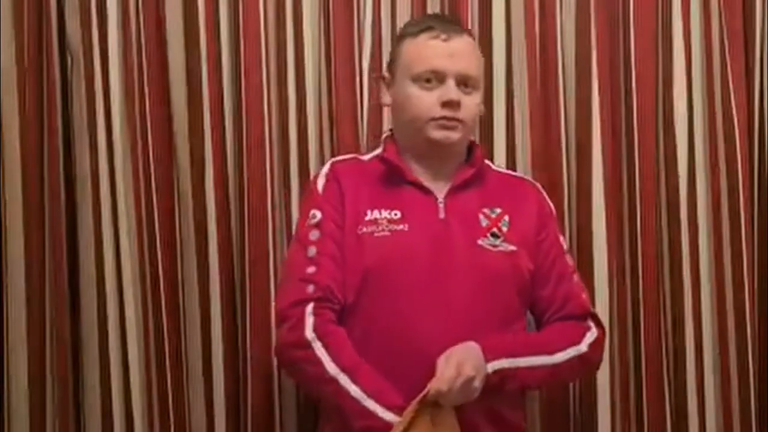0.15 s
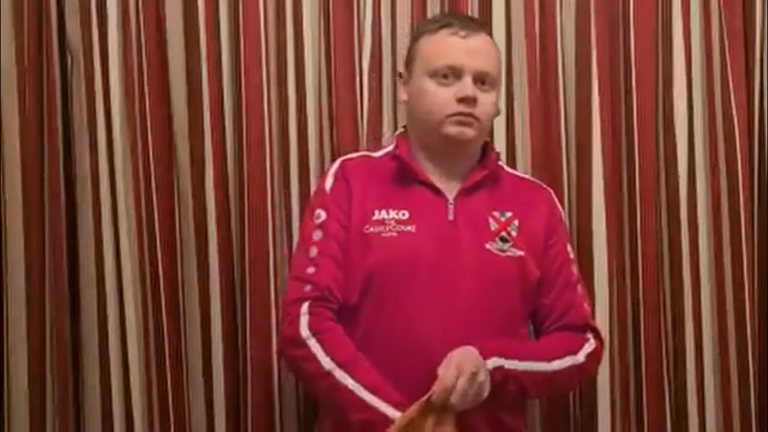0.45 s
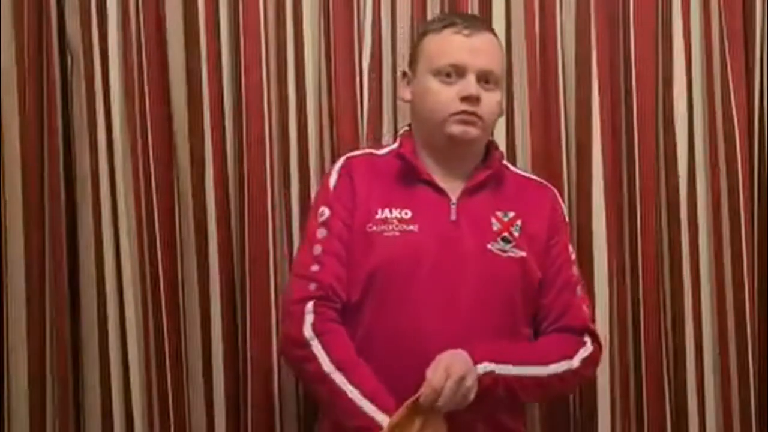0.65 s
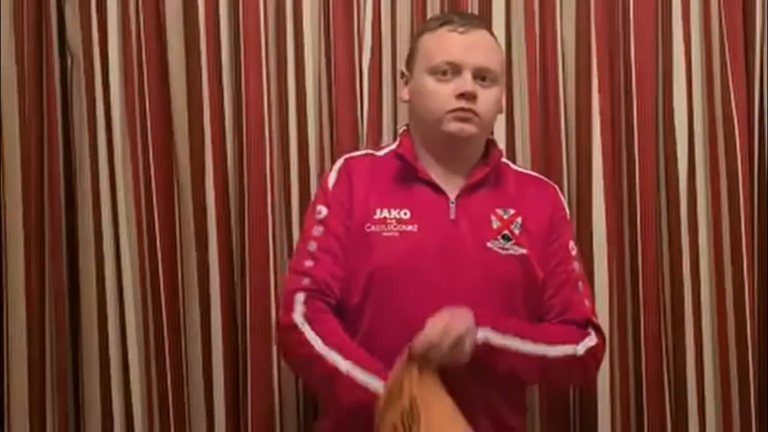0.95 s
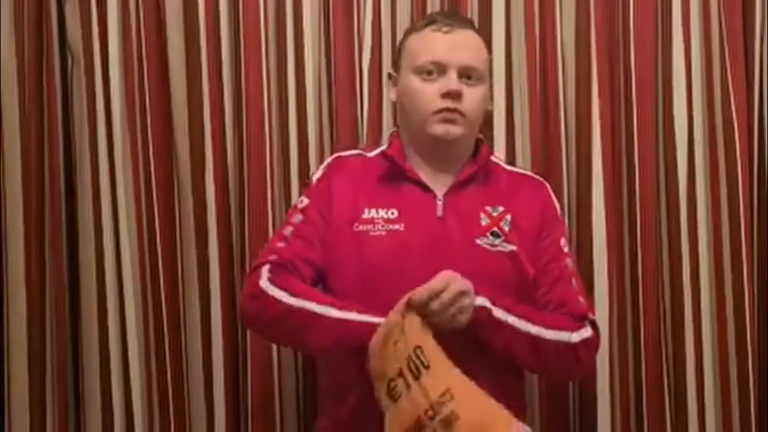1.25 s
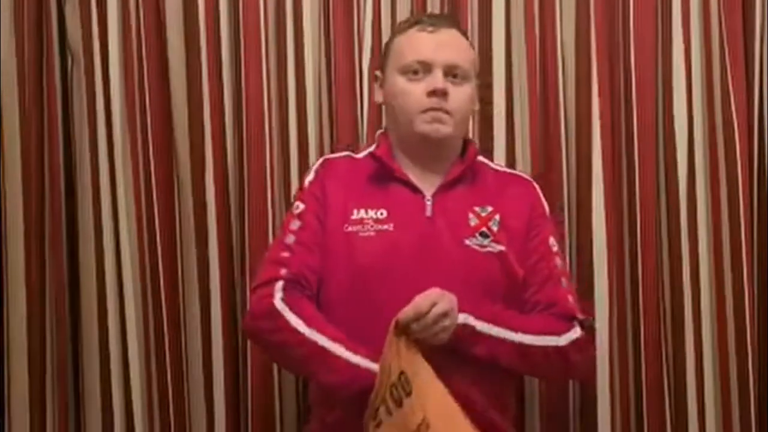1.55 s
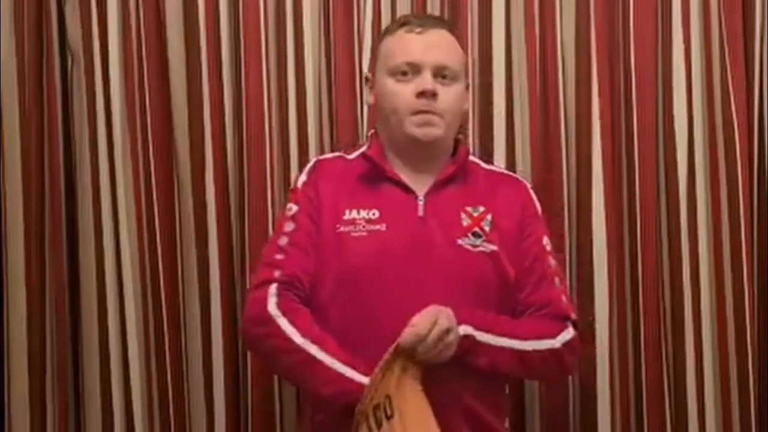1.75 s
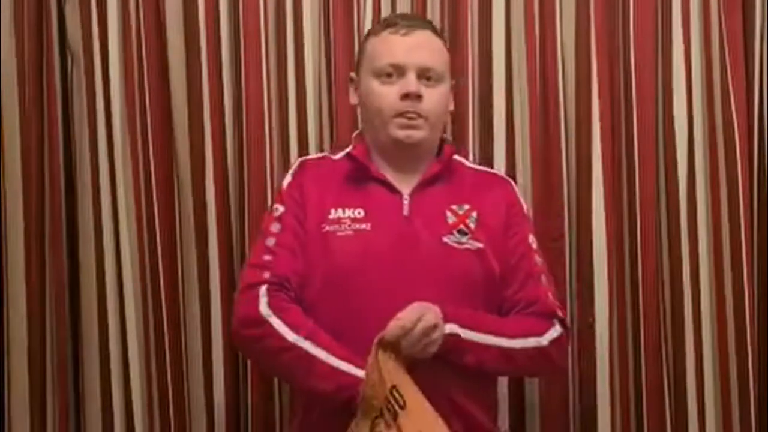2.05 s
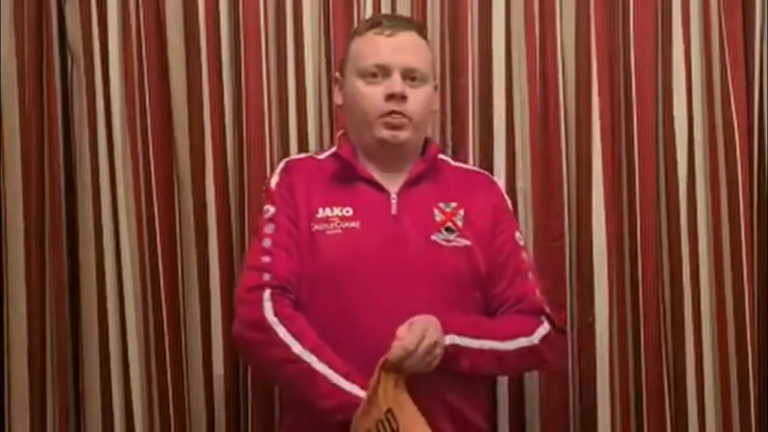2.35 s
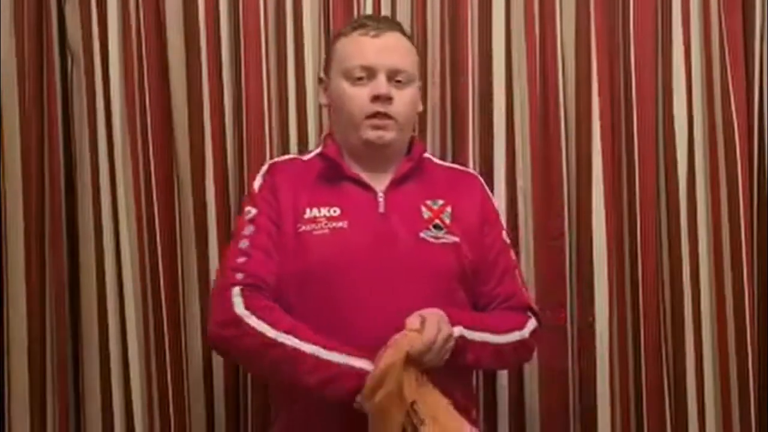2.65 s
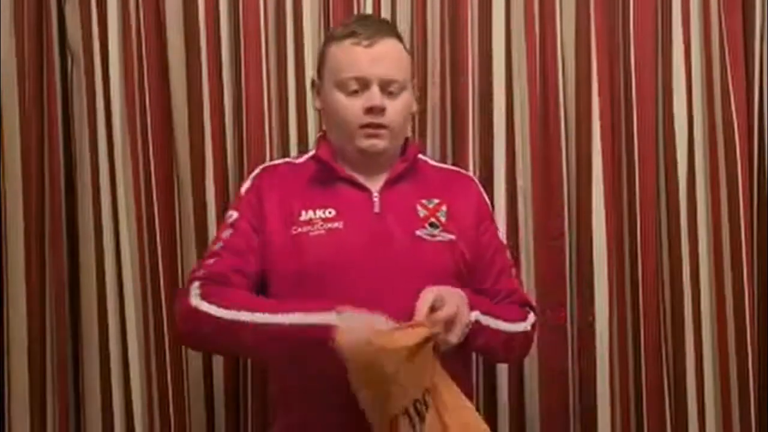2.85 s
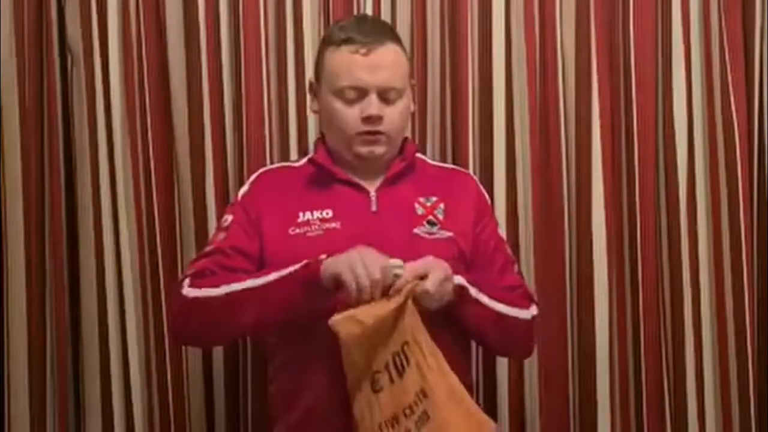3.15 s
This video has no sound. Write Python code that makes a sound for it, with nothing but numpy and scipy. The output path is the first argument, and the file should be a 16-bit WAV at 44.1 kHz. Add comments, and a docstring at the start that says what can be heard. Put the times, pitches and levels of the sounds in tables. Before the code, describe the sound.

Light hollow plastic balls are stirred in a thin bag from the start, clattering irregularly with short dry knocks and high crackly rustle. The stirring swells around 1.2-1.5 s, dips near 1.7 s, and bursts into its sharpest clacks at 2.0-2.2 s. It fades by 2.4 s, with a few weak knocks to 2.75 s. Faint finger rubs and ticks follow, notably at 3.0 s, over soft hiss and low rumble in a small room.

```python
"""In a curtained room, a step away, a hand stirs light hollow plastic balls in a thin bag.
Dense clatter is a sum of random damped sines; clear knocks excite the modes of single shells.
The bag's rustle and crackle are high-pitched grains and shaped noise; the load's thuds are damped
low sines. At the end fingers turn the drawn ball, as grains and shaped noise of rubbing skin.
Decaying noise gives the room's reverberation, over a steady hiss and a low rumble."""
import sys
import numpy as np
from scipy import signal
from scipy.fft import rfft, irfft, next_fast_len
from scipy.io import wavfile
from scipy.ndimage import uniform_filter1d, map_coordinates

SR = 44100
rng = np.random.default_rng(int(sys.argv[2]) if len(sys.argv) > 2 else 0)


def put_to_file(sound):
    """Save the sound as 16-bit audio at rate SR, in the file named by the first command-line argument."""
    columns = np.atleast_2d(sound).T  # one column per channel
    safe = np.clip(columns, -1, 1)
    whole_steps = np.round(safe * 32767)
    wavfile.write(sys.argv[1], SR, whole_steps.astype(np.int16))


N = 145530  # samples

# Drive of the stirring hand: t/s, clatter level/dB, bag rustle re clatter level/dB,
# low part re the upper part of the clatter level/dB
STIRRING_DRIVE = [(0, -49, -6.5, -4), (.03, -52.5, -6, -4), (.085, -49.5, -5, -3.5), (.1, -44.5, -4.5, -6),
                  (.16, -52.5, -1.5, -4), (.235, -44, -3, -8), (.265, -50.5, -6, -2.5),
                  (.3, -49, 2.5, -2.5), (.315, -44.5, 0.5, -5), (.52, -45.5, -1.5, -11.5),
                  (.55, -50, 0, -9), (.565, -44.5, -1, -8.5), (.62, -42, -2.5, -11), (.65, -44, -1, -8),
                  (0.684, -42, -5.5, -4.5), (.735, -49, -8, -16), (0.747, -43.5, -3, -4.5),
                  (.81, -46, -3, -4.5), (.86, -52.5, -7, -10), (0.894, -51, 0, -9), (.903, -44, -6, -10),
                  (0.936, -42, -3, -4.5), (.98, -49.5, -4, -10), (.992, -42.5, -5, -5.5),
                  (1.07, -55, 2.5, -14), (1.1, -50, -2.5, -3), (1.17, -49, -1, -19.5),
                  (1.21, -41, 1, -15.5), (1.39, -41.5, -2.5, -10), (1.415, -38.5, 0, -6),
                  (1.48, -38.5, -5.5, -10.5), (1.54, -44, -3, -10.5), (1.59, -49.5, -3, -8.5),
                  (1.771, -57.5, -3, -10), (1.779, -44, -5, -20), (1.85, -45, 0, -6.5),
                  (1.89, -49.5, -3.5, -12), (1.95, -44, 2, -12), (1.982, -43.5, -5, -17),
                  (1.987, -36.5, -7, -25), (2.065, -50.5, -4, -11.5), (2.135, -48, -3.5, -15),
                  (2.14, -37.5, -4, -16), (2.189, -40, -3, -10.5), (2.3, -53.5, -5, -9),
                  (2.372, -69.5, -8, -12), (2.382, -54, -2, -12), (2.49, -63, -7, -5), (2.545, -53, 2, -14),
                  (2.59, -60, -6, -10), (2.6, -52.5, -1.5, -13.5), (2.759, -53.5, -1.5, -12),
                  (2.83, -76.5, -7, -2.5), (3.012, -82.5, -7, -1), (3.022, -60, -2.5, -2.5),
                  (3.3, -82, -3, -4)]
# Clear knocks: t/s, shell level/dB, nominal pitch f/Hz, snap of the bag re shell level/dB
BALL_KNOCKS = [(0.1, -23, 1040, -14.5), (0.229, -31, 1020, -16.5), (0.386, -27.5, 1580, -12.5),
               (0.447, -27, 1530, -14), (0.563, -30, 1410, -10.5), (0.618, -32, 1530, -15),
               (0.627, -31, 1500, -14), (0.676, -27, 1680, -13.5), (0.678, -25, 1510, -14),
               (0.745, -32.5, 1590, -9), (0.776, -24.5, 953, -17), (0.812, -27, 1570, -16),
               (0.906, -30, 1110, -11), (0.921, -27.5, 1190, -8), (0.989, -25.5, 1740, -15),
               (1.125, -29, 1470, -8.5), (1.16, -31, 1450, -12), (1.174, -23, 1490, -17),
               (1.195, -25.5, 1550, -12.5), (1.287, -27.5, 1480, -11), (1.36, -31, 1760, -5.5),
               (1.413, -30, 1550, -7.5), (1.425, -23, 1040, -15), (1.437, -24, 1470, -16),
               (1.451, -31, 1790, -14), (1.472, -29, 1720, -16), (1.488, -26, 940, -19),
               (1.56, -26, 1520, -21), (1.611, -30.5, 1140, -11), (1.778, -41.5, 1540, -5),
               (1.786, -25, 1680, -19), (1.832, -31.5, 1600, -4.5), (1.986, -20.5, 1410, -15),
               (1.987, -21, 1620, -15), (1.992, -23, 1580, -14), (2.005, -28, 1600, -20),
               (2.083, -33, 1520, -12), (2.117, -24, 1550, -16), (2.14, -24.5, 1510, -12),
               (2.147, -24, 1850, -19.5), (2.16, -31, 1500, -12), (2.183, -24, 1480, -14),
               (2.196, -28, 1490, -18), (2.208, -25.5, 1380, -15), (2.382, -34.5, 1550, -17),
               (2.643, -37, 1630, -18), (2.713, -36.5, 1780, -6), (3.094, -42, 1420, -19)]
# Drops of the load: t/s, level before filtering/dB
LOAD_THUDS = [(.891, -47.5), (0.911, -51), (1.669, -66), (2.129, -63)]
# Modes of one shell: multiple of the pitch/1, level re the knock/dB, T60/ms
SHELL_MODES = [(1, 1, 7.6), (1.9, -5, 4.2), (.6, -18.5, 7.3), (2.7, -11, 2.9)]
# Spectrum of the heap of balls: f/Hz, relative level per Hz/dB
HEAP_SPECTRUM = [(88, -46), (150, -23), (288, -22), (372, -12), (577, -7), (818, -6.5), (981, -4),
                 (1110, -5.5), (1570, -3), (2190, -9), (3200, -8), (5600, -23.5), (7280, -66),
                 (12300, -120)]
# Spectrum of the bag film: f/Hz, relative level per Hz/dB
BAG_SPECTRUM = [(3180, -34), (5400, -30), (5930, -4.5), (6730, -2.5), (7800, -2.5), (8770, -1.5),
                (10200, -2.5), (11000, 3), (12400, 4.5), (13000, 3), (14400, -1.5), (15800, -11)]
# Spectrum of the steady background: f/Hz, relative level per Hz/dB
FLOOR_SPECTRUM = [(90, -32), (150, 9), (1000, -29), (4000, -9), (7000, -0.5), (9000, -18), (15800, -17)]
# Spectrum of the low rumble: f/Hz, relative level per Hz/dB
RUMBLE_SPECTRUM = [(15, -46), (25, 0), (70, 3.5), (113, -5.5), (140, -3.5), (260, -10.5), (340, -26),
                   (570, -120)]
# Reverberation of the room before each tail's scale: f/Hz, T60/s
ROOM_DECAY = [(300, 0.33), (1500, 0.11), (5000, 0.15), (12000, 0.22)]
# Stereo width, the gain of the side signal: f/Hz, level/dB
SIDE_GAIN = [(60, -2.5), (110, -12.5), (200, -10.5), (380, -11), (700, -4), (1290, 1), (2380, -1.5),
             (4400, 1), (7000, -2.5), (8500, -22), (11500, -15.5), (14500, -18)]
# Notches of the microphone housing: centre f/Hz, half-width/Hz, depth/1 (capped when applied)
HOUSING_NOTCHES = [(5340, 67, 1), (7860, 530, 0.45), (13040, 430, 0.71)]
# Fingers turning one ball: t/s, level/dB
FINGER_DRIVE = [(2.799, -63.5), (2.922, -85.5), (2.934, -66.5), (2.962, -84), (3.012, -78), (3.021, -53.5),
                (3.138, -100), (3.162, -65), (3.184, -101), (3.3, -88)]
# Spectrum of skin on plastic: f/Hz, relative level per Hz/dB
SKIN_SPECTRUM = [(1180, -19), (2000, -7), (3550, -6), (4050, 7), (5500, -14), (6570, 4.5), (7400, -5),
                 (8310, -17), (11600, -7), (15000, -14)]
# Free balls ringing at their shell pitch: t/s, level re the upper part of the clatter/dB
FREE_SHELL_DRIVE = [(0, -14.5), (1.1, -13), (1.6, -12), (1.95, -12), (2.75, -5), (3.0, -22)]

CLATTER_PER_S, CLATTER_HZ, CLATTER_CYCLES = 1000, 1504, 2.25
CLATTER_PITCH_SPREAD, CLATTER_SPREAD_DB = 0.47, 5.5  # log-pitch deviation; mean excess level
RUB_DB = -6  # balls sliding on cloth, re the contacts
LOW_PART_HZ = 950  # split of the clatter
SHELL_HZ, SHELL_CUT_HZ = 1559, 715  # mean pitch; a small shell radiates no bass
CRACKLE_PER_S, CRACKLE_HZ, CRACKLE_SPREAD_DB = 1500, 10800, 10.5
HISS_DB = 3.5  # smooth rustle re the crackle
CONTACT_S = 0.00016  # time constant of a contact's rise
LOUDEST_DB = 11  # cap on a chance contact
MODE_SCATTER, MODE_SCATTER_DB = 0.034, 1.5  # pitch ratio and level, knock to knock
SNAP_RISE_S, SNAP_T60_S = 0.00084, 0.029
KNOCK_DIRECT_DB = 4  # knocks arrive more directly than the heap
THUD_HZ, THUD_T60_S = 64, 0.12
ROOM_DB = -1.5  # reverberation re dry sound, in the mid
FLOOR_DB = -81
RUMBLE_DB, RUMBLE_END_DB = -80.5, -84.5  # while stirring, at the end
LEFT_DB = -1.54  # left re right channel gain
TOP_HZ = 15770


def amp(db):
    """Level definition: 20 dB is a factor of ten in amplitude."""
    return 10 ** (np.asarray(db) / 20)


def unit(x):
    """Normalization by the root mean square."""
    return x / np.sqrt(np.mean(x ** 2) + 1e-20)


def along(points, hz):
    """Interpolation on a logarithmic frequency axis."""
    f, value = np.transpose(points)
    return np.interp(np.log(hz + 1), np.log(f + 1), value)


def over_time(t_s, values, **ends):
    """Linear interpolation in time, at every sample."""
    return np.interp(np.arange(N) / SR, t_s, values, **ends)


def noise():
    """White noise: equal mean power at every frequency."""
    return rng.standard_normal(N)


def filtered(x, response):
    """Linear filtering: the spectrum is multiplied by a frequency response."""
    size = next_fast_len(N + SR // 2)  # padding lets the response die out
    return irfft(rfft(x, size) * response(np.fft.rfftfreq(size, 1 / SR)), size)[..., :N]


def shaped(x, spectrum):
    """Spectral shaping: broad bands are whitened, then weighted; rms 1."""
    z = rfft(x)
    broad = np.sqrt(np.abs(uniform_filter1d(np.abs(z) ** 2, size=1500))) + 1e-9
    weight = amp(along(spectrum, np.fft.rfftfreq(N, 1 / SR)))
    return unit(irfft(z / broad * weight, N))


def wobble(rate):
    """Slow random modulation: a smooth curve through `rate` random knots a second."""
    knots = rng.standard_normal(int(N * rate / SR) + 4)
    return map_coordinates(knots, [np.arange(N) * rate / SR])


def rings(s, hz, gain, t60, size=900):
    """Free damped vibration: each contact starts an exponentially decaying sine."""
    t = np.arange(size) / SR
    decay = amp(-60 * t / t60[:, None])
    rise = 1 - np.exp(-t / CONTACT_S)
    wave = gain[:, None] * np.sin(2 * np.pi * hz[:, None] * t) * decay * rise
    at = (s * SR).astype(int)[:, None] + np.arange(size)
    return np.bincount(at.ravel(), wave.ravel(), N + size)[:N]


def grains(per_s, hz, spread, cycles, spread_db, size):
    """Random superposition of brief contacts of scattered pitch, mostly weak; rms 1."""
    count = int(per_s * N / SR)
    s = rng.random(count) * N / SR
    pitch = np.clip(hz * np.exp(spread * rng.standard_normal(count)), 500, 15500)
    gain = amp(np.minimum(spread_db * rng.standard_exponential(count), LOUDEST_DB))
    t60 = np.log(1000) / 2 * cycles / pitch  # amplitude falls by e squared in `cycles` periods
    return unit(rings(s, pitch, gain, t60, size))


def heap_clatter(low_db):
    """Multiple impacts: balls collide and slide, and free shells ring at their own pitch."""
    contacts = grains(CLATTER_PER_S, CLATTER_HZ, CLATTER_PITCH_SPREAD, CLATTER_CYCLES,
                      CLATTER_SPREAD_DB, size=700)
    sliding = shaped(noise(), HEAP_SPECTRUM)
    heap = shaped(contacts + amp(RUB_DB) * sliding, HEAP_SPECTRUM)
    low = filtered(heap, lambda hz: 1 / (1 + (hz / LOW_PART_HZ) ** 4))
    heap = unit(heap - low) + amp(low_db) * unit(low)
    free_shells = grains(250, SHELL_HZ, 0.086, 7.0, 3.6, size=700)
    return heap + amp(over_time(*np.transpose(FREE_SHELL_DRIVE))) * free_shells


def bag_rustle():
    """Thin-film crackle: dense high-pitched snaps lie in smooth hiss."""
    crackle = grains(CRACKLE_PER_S, CRACKLE_HZ, 0.368, 8.6, CRACKLE_SPREAD_DB, size=100)
    hiss = shaped(noise(), BAG_SPECTRUM)
    return shaped(crackle + amp(HISS_DB) * hiss, BAG_SPECTRUM)


def stirring():
    """Common excitation: one hand drives the heap's clatter and the bag's rustle."""
    s, level_db, rustle_db, low_db = np.transpose(STIRRING_DRIVE)
    level_db = over_time(s, level_db) + 0.66 * wobble(60)
    rustle_db = over_time(s, rustle_db) + 1.8 * wobble(40.06)
    heap = heap_clatter(over_time(s, low_db))
    return amp(level_db) * (heap + amp(rustle_db) * bag_rustle())


def room_tail(x, scale, delay_s):
    """Reverberation: delayed diffuse sound decays at a rate set by frequency."""
    out, hop = np.zeros(N + SR), 4096
    for a in range(0, N, hop):  # a new random tail for each short stretch
        hz, t, z = signal.stft(rng.standard_normal(SR // 3), SR, nperseg=256)
        t60 = scale * along(ROOM_DECAY, hz)[:, None]
        response = signal.istft(z * amp(-60 * t / t60), SR, nperseg=256)[1]
        part = signal.fftconvolve(x[a:a + hop], response / np.linalg.norm(response))
        out[a + int(delay_s * SR):][:len(part)] += part
    return out[:N]


def background():
    """Stationary noise: independent mid and side hiss and rumble, slowly modulated."""
    hiss = np.array([shaped(noise(), FLOOR_SPECTRUM) for _ in "ms"])
    rumble = np.array([shaped(noise(), RUMBLE_SPECTRUM) for _ in "ms"])
    rumble_db = over_time([2.2, 2.9], [RUMBLE_DB, RUMBLE_END_DB])
    return amp(FLOOR_DB + 3.1 * wobble(5.38)) * hiss + amp(rumble_db + 1.4 * wobble(5.3)) * rumble


def knocks():
    """Modal excitation: an impact rings a shell's modes briefly and snaps the bag."""
    s, db, hz, snap_db = np.transpose(BALL_KNOCKS)
    shell = np.zeros(N)
    for multiple, mode_db, t60_ms in SHELL_MODES:
        pitch = hz * multiple * (1 + MODE_SCATTER * rng.standard_normal(len(s)))
        gain = amp(db + mode_db + MODE_SCATTER_DB * rng.standard_normal(len(s)))
        shell += rings(s, pitch, gain, np.full(len(s), t60_ms / 1000))
    spikes = np.bincount((s * SR).astype(int), amp(db + snap_db), N)[:N]
    t = np.arange(1500) / SR
    snap = amp(-60 * t / SNAP_T60_S) * (1 - np.exp(-t / SNAP_RISE_S))
    burst = signal.fftconvolve(spikes, snap)[:N]
    both = shell + burst * shaped(noise(), BAG_SPECTRUM)
    return filtered(both, lambda f: (1j * f / (SHELL_CUT_HZ + 1j * f)) ** 3)


def thuds():
    """Low-frequency impulse response: the load drops in the bag with a soft push."""
    s, db = np.transpose(LOAD_THUDS)
    push = rings(s, np.full(len(s), THUD_HZ), -amp(db), np.full(len(s), THUD_T60_S), size=8000)
    return filtered(push, lambda hz: 1j * hz / (30 + 1j * hz) / (1 + 1j * hz / 150))


def fingers():
    """Sliding friction: skin rubs and ticks on the drawn ball."""
    s, db = np.transpose(FINGER_DRIVE)
    ticks = grains(900, 5000, 0.61, 6.6, 5.6, size=200)
    rub = amp(1) * shaped(noise(), SKIN_SPECTRUM)  # 1 dB over the ticks
    level_db = over_time(s, db, left=-120) + 1.3 * wobble(40)
    return amp(level_db) * shaped(ticks + rub, SKIN_SPECTRUM)


def scene():
    """Mid-side superposition: direct sound in the mid, diffuse sound in mid and side."""
    hits = knocks()
    dry = stirring() + fingers() + hits
    direct = dry + (amp(KNOCK_DIRECT_DB) - 1) * hits
    mid = direct + amp(ROOM_DB) * room_tail(dry, 0.68, 0.006)
    mid = mid / np.sqrt(1 + amp(2 * ROOM_DB))  # keeps the power of direct plus diffuse sound
    side = room_tail(dry, 0.86, 0.001195)
    hush = background()
    mid = mid + hush[0] + thuds()
    side = filtered(side + hush[1], lambda hz: amp(along(SIDE_GAIN, hz)))
    return np.array([mid + side, mid - side]) * amp([[LEFT_DB / 2], [-LEFT_DB / 2]])


def record(dry):
    """Transducer response: narrow notches of the microphone housing, then a band limit."""
    def notches(hz):
        """Resonant absorption: a dip of Lorentzian shape at each centre."""
        gain = 1
        for centre, width, depth in HOUSING_NOTCHES:
            gain = gain * (1 - np.clip(depth, 0, 0.95) / (1 + ((hz - centre) / width) ** 2))
        return gain
    return filtered(filtered(dry, notches), lambda hz: hz < TOP_HZ)


dry = scene()
out = record(dry)
put_to_file(out)
```